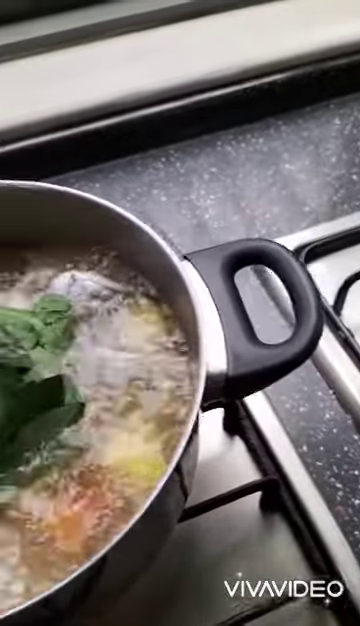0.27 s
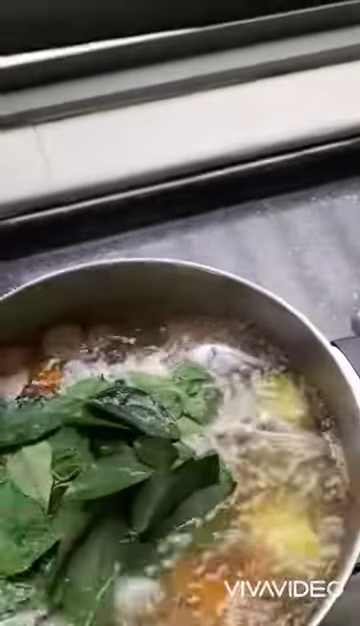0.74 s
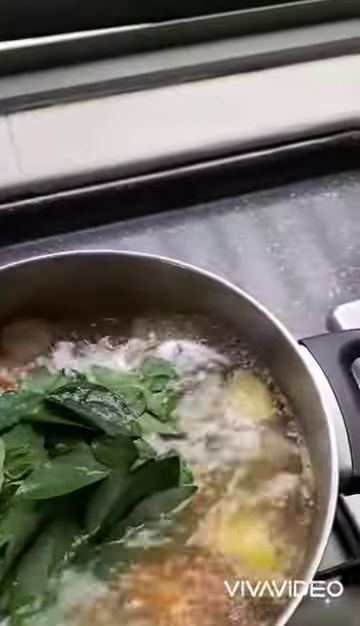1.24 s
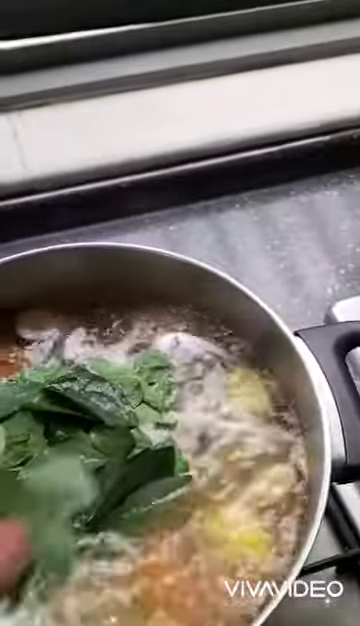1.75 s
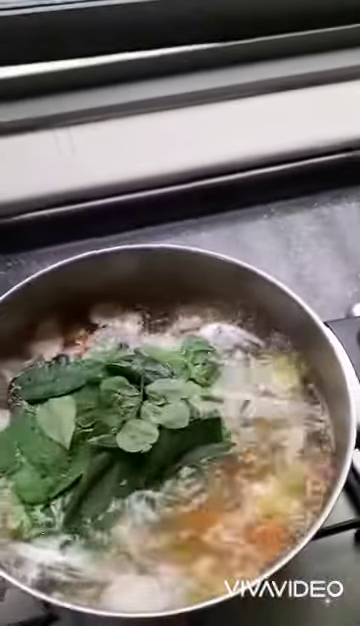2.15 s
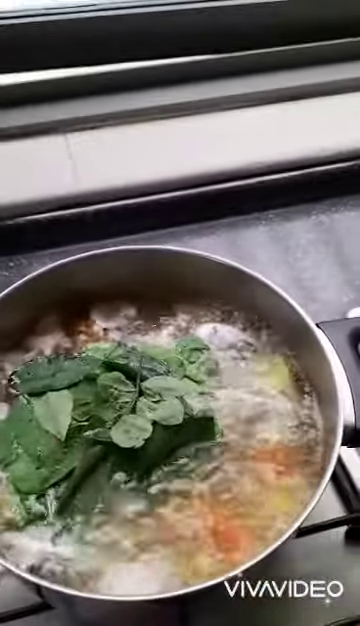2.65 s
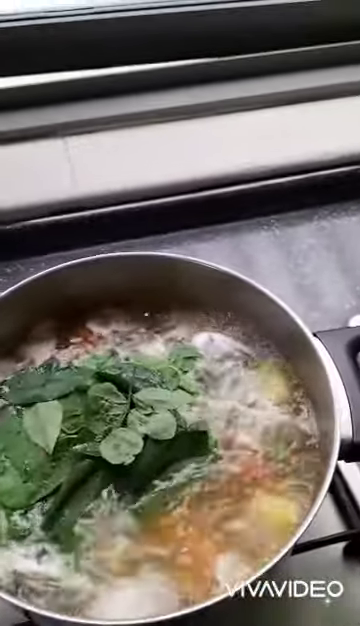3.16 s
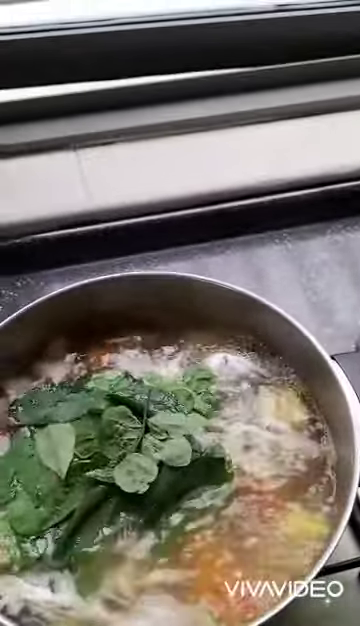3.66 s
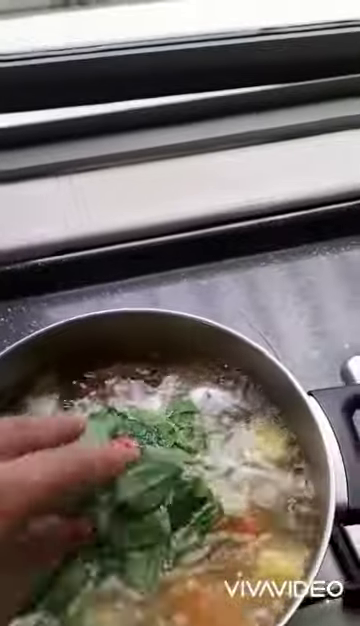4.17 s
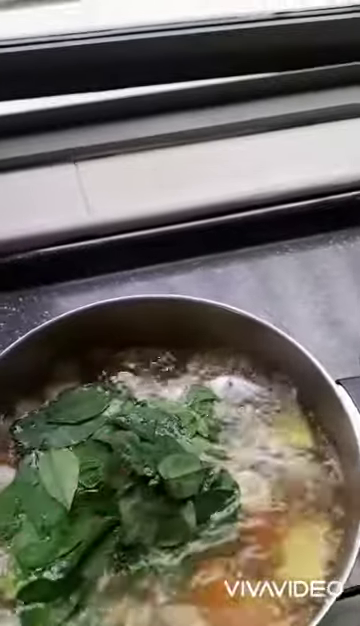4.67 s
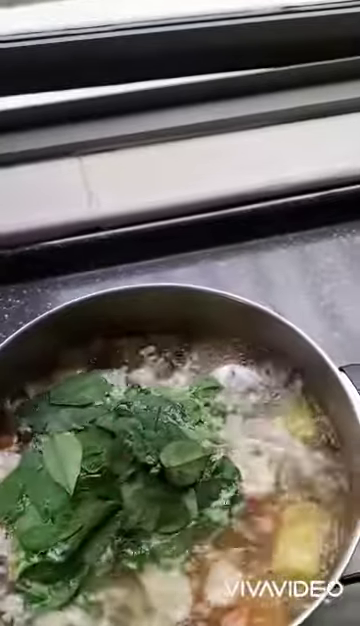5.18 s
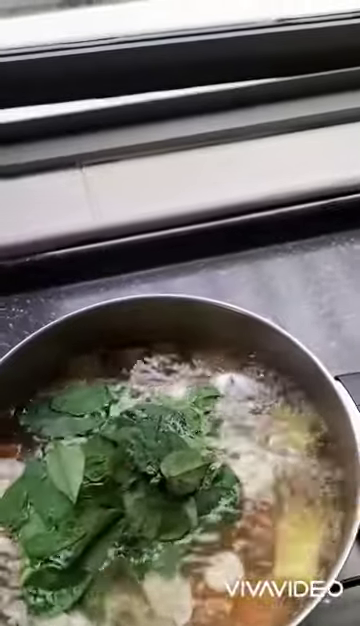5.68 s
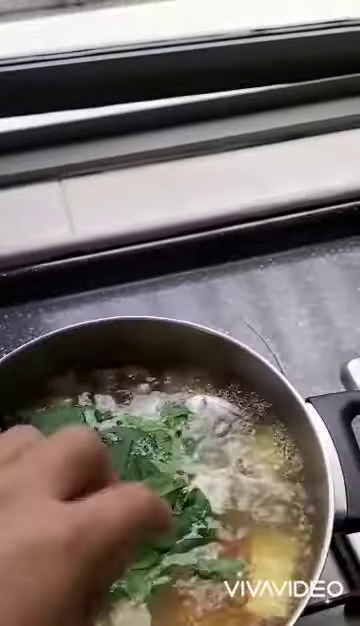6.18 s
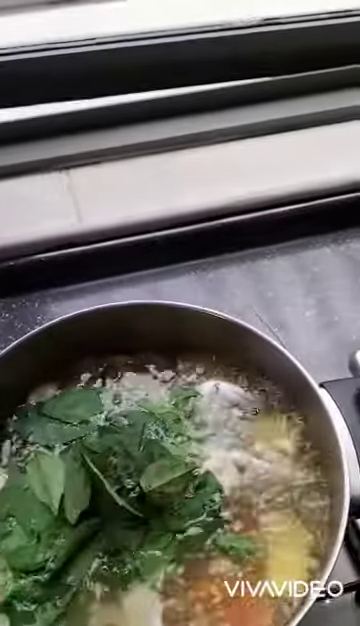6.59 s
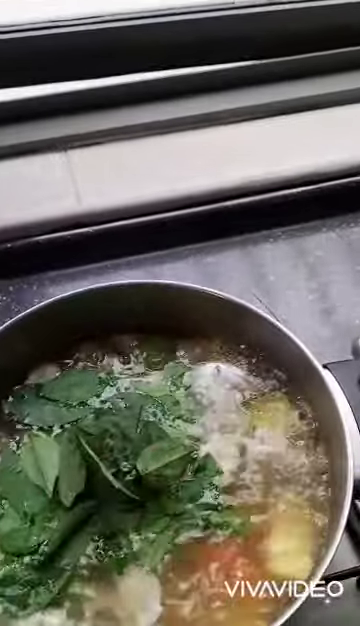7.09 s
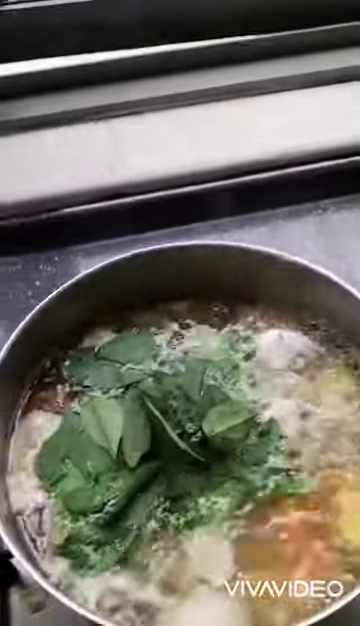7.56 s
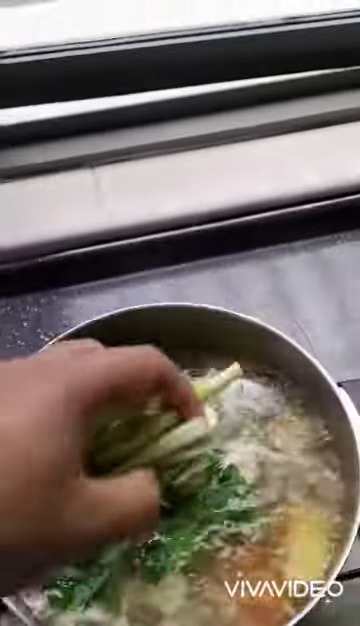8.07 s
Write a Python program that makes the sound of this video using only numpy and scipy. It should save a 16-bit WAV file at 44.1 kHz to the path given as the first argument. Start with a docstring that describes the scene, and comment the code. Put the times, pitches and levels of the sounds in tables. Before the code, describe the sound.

In a small hard-walled kitchen, close above a steel pot, a utensil bounces in a fast, loud, ringing clatter right at the start. A very quiet burner rush and simmer follow, with soft plops and spatter near three seconds, light hollow knocks, a faint wavering whistle, a sharper knock and droplets around seven, and a short sizzle near the end.

```python
"""Soup pot on a gas stove

Soup simmers in a steel pot in a small kitchen, heard from just above the rim. A utensil clatters against
the steel; later come light knocks, plops, spattering drops and a sizzle as greens are dropped in.
Struck things are sums of fading tones plus noise; bubbles are short tones that rise in pitch.
Spray, sizzle and the burner's rush are coloured noise; a faint whistle is one tone that rises and falls."""
import sys
import numpy as np
from scipy import signal
from scipy.fft import rfft, irfft, next_fast_len
from scipy.io import wavfile
from scipy.ndimage import uniform_filter1d

SR = 44100
rng = np.random.default_rng(int(sys.argv[2]) if len(sys.argv) > 2 else 0)


def transcribe(u):
    """Save the signal u as a 16-bit wav file named by the first command-line argument.

    u: samples, shape (n,) or (channels, n), limited to [-1, 1]; the rate is SR.
    q: integer samples, one column per channel.
    """
    v = np.clip(np.atleast_2d(u).T, -1, 1)
    q = np.round(v * 32767).astype(np.int16)
    wavfile.write(sys.argv[1], SR, q)


N = 367353
TAIL = 2 ** 15  # samples given to each short sound
TIME = np.arange(N) / SR  # s, since the start
AGE = np.arange(TAIL) / SR  # s, since a short sound began
BLOW_SAMPLES = SR * .02  # 20 ms

# blows of the clattering utensil: (t/s, level/dB, contact tone f/Hz, contact tone/dB, its t60/s, treble/dB)
CLATTER = [(.1602, -17, 920, 4.5, 0.024, 0), (.2271, -13, 900, 4.5, 0.02, -2.5),
           (.2358, -11, 1000, 9, .06, 5.5), (.2385, -19, 4060, -2, .04, -2),
           (.2465, -16.5, 997, 7, .05, -2.5), (.2657, -10.5, 820, 6.5, .03, 4.5),
           (.2748, -12.5, 786, 2, .025, 3), (.2822, -13.5, 760, 5.5, .012, 0.5),
           (.2936, -11.5, 3340, 1, .04, 4.5), (.2972, -15.5, 1700, 0.5, 0.017, 3.5),
           (.3074, -18.5, 950, 1, .025, 0), (.3100, -18.5, 1610, -0.5, 0.027, 0.5),
           (.3176, -20, 760, 3, .03, -1.5), (.3225, -21, 480, 2.5, .04, 0), (.3285, -21, 560, 4, .025, -12)]
FIRST_TOUCH, LATER_BLOWS = CLATTER[:1], CLATTER[1:]
# colour of the noisy crack of a hard blow: (f/Hz, level per Hz/dB)
CRACK = [(100, -26), (420, 2), (560, -3), (950, 0.5), (1420, -13.5), (1650, -9), (1950, -19.5),
         (2500, -10.5), (3050, -19), (3400, -10.5), (4800, -16.5), (6200, -27.5), (8500, -39), (11500, -51)]
# colour of water boiling off hot metal: (f/Hz, level per Hz/dB)
SIZZLE_COLOUR = [(1500, -8), (2700, 7.5), (4000, 6.5), (6500, -0.5), (7800, -20), (10500, -27),
                 (12500, -34)]


def undb(db):
    """Decibels to gain."""
    return 10 ** (np.asarray(db) / 20)


def unit(x):
    """Scale to an rms of one."""
    return x / np.sqrt(np.mean(x ** 2))


def burst(x):
    """Scale a short sound to the energy of 20 ms at an rms of one."""
    return x / np.sqrt(np.sum(x ** 2) / BLOW_SAMPLES)


def fade(t60):
    """Exponential decay that drops 60 dB in t60 seconds."""
    return np.exp(-np.log(1000) * AGE / max(t60, 1 / SR))


def swell(attack_s, length_s):
    """A straight rise multiplied by a rounded fall."""
    return np.minimum(AGE / attack_s, 1) * np.exp(-(AGE / length_s) ** 2)


def walk(rate):
    """Slow random motion with an rms near one: random steps, rate per second, smoothed into slopes."""
    step = int(SR / rate)
    stairs = np.repeat(rng.standard_normal(N // step + 1), step)
    return unit(uniform_filter1d(stairs, step)[:N])


def add(track, s, sound):
    """Mix a sound in at time s."""
    start = int(np.clip(s * SR, 0, N - 1))
    track[start:start + len(sound)] += sound[:N - start]


def freqs(x):
    """Frequencies of the spectrum of x, kept at 1 Hz or more so that their logarithm exists."""
    return np.maximum(np.fft.rfftfreq(len(x), 1 / SR), 1)


def on_log_axis(hz, points):
    """Read (Hz, value) points on a log-frequency axis."""
    at, value = np.transpose(points)
    return np.interp(np.log(hz), np.log(at), value)


def noise(points, size):
    """Noise with a given colour."""
    white = rng.standard_normal(next_fast_len(size))
    gain = undb(on_log_axis(freqs(white), points))
    return unit(irfft(rfft(white) * gain, len(white)))[:size]


def octaves(x):
    """Split into overlapping octave bands that sum to x: (centre Hz, band)."""
    centres = 2. ** np.arange(6, 15)
    padded = np.pad(x, (0, next_fast_len(len(x)) - len(x)))
    spectrum, axis = rfft(padded), np.log(freqs(padded))
    bands = []
    for hz in centres:
        share = np.interp(axis, np.log(centres), centres == hz)
        bands.append((hz, irfft(spectrum * share, len(padded))[:len(x)]))
    return bands


def lowpass(x, hz, order):
    """Butterworth low-pass."""
    return signal.sosfilt(signal.butter(order, min(hz, SR / 3), fs=SR, output="sos"), x)


def ring(hz, t60):
    """One mode: a tone that dies away."""
    return np.sin(2 * np.pi * hz * AGE) * fade(t60)


def split_ring(hz, t60):
    """A mode of a not quite round object: a close pair of tones, shifted a little by each contact."""
    stray = 0.0035 * np.clip(rng.standard_normal(2), -2, 2)  # share of the mode's frequency
    one, other = hz * (1 + stray)
    return ring(one, t60) + rng.uniform(-1.1, 1) * ring(other, t60)


def crack(colour, t60):
    """A burst of fading noise through a filter of the given colour, which never sounds ahead of the blow."""
    # folding the cepstrum onto positive times makes the filter causal
    cepstrum = irfft(np.log(undb(on_log_axis(freqs(AGE), colour))))
    cepstrum[1:] *= 2 * (np.arange(1, TAIL) < TAIL / 2)
    burst_of_noise = rng.standard_normal(TAIL) * fade(t60)
    return burst(irfft(np.exp(rfft(cepstrum)) * rfft(burst_of_noise)))


def blows(rows, modes, colour, ring_share, crack_db, crack_t60, swell_s, treble_hz, soft_hz):
    """Each blow rings the modes, cracks, and briefly sounds the resonance of the contact."""
    out = np.zeros(N)
    middling_db = np.mean([row[1] for row in rows])
    for s, db, contact_hz, contact_db, contact_t60, treble_db in rows:
        # blows louder than the average ring and crack for longer
        stretch = np.exp(0.0576 * (db - middling_db))
        # the place that is struck decides the sign and strength of each mode
        weights = rng.choice([-1, 1], len(modes)) * undb(rng.standard_normal(len(modes)))
        body = np.zeros(TAIL)
        for weight, (hz, mode_db, t60) in zip(weights, modes):
            body += weight * undb(mode_db) * split_ring(hz, t60 * ring_share * stretch)
        contact = ring(contact_hz, contact_t60) * (1 - fade(swell_s))
        # the contact force builds over about a millisecond
        hit = burst(body) + undb(crack_db) * crack(colour, crack_t60 * stretch)
        hit *= 1 - fade(0.0018)
        # each blow has its own amount of treble
        dull = lowpass(hit, treble_hz, order=1)
        hit = dull + undb(treble_db) * (hit - dull) + undb(contact_db) * burst(contact)
        # the push is not instant, and thin steel radiates little bass
        hit = lowpass(hit, soft_hz, order=3)
        hit = signal.sosfilt(signal.butter(2, 130, "high", fs=SR, output="sos"), hit)
        add(out, s, undb(db) * burst(hit))
    return out


def first_touch():
    """The utensil's first touch sounds its own short-lived modes."""
    # modes of the utensil: (f/Hz, level/dB, t60/s)
    utensil = [(409, -8, 0.05), (960, 0, .035), (1170, -7, .04), (1712, -1, .04), (2150, -2.5, .035),
               (2616, -8.5, 0.039), (3340, -1.5, .026), (4160, -7.5, .045), (4605, -13.5, .045),
               (6600, -25, .05)]
    return blows(FIRST_TOUCH, utensil, CRACK, ring_share=1.0, crack_db=-3, crack_t60=0.03,
                 swell_s=0.03, treble_hz=1800, soft_hz=5300)


def clatter():
    """The utensil bounces freely and rings the steel."""
    # modes of the steel: (f/Hz, level/dB, free t60/s)
    steel = [(256, -16, .4), (370, -7.5, 0.31), (413, -3, .24), (465, -2, .3), (556, -4, .22),
             (648, -8.5, .36), (710, -6.5, 0.25), (754.7, -1, 0.27), (838, -1, .28), (879.5, -3, 0.19),
             (946, -8, .26), (1000, 1, .24), (1543, -8, 0.38), (1660, -11.5, 0.4), (2072, -19.5, .45),
             (2377, -13, .38), (2584, -12, 0.5), (2960, -16.5, 0.23), (3187, -15.5, .28), (3400, -15.5, .3),
             (3652, -10, 0.22), (4135, -11, .3), (4250, -18, .56), (4765, -18.5, .38), (4910, -18, 0.43),
             (5720, -22.5, .27), (6500, -31, .3)]
    return blows(LATER_BLOWS, steel, CRACK, ring_share=.68, crack_db=-0.5, crack_t60=0.032,
                 swell_s=0.0048, treble_hz=1790, soft_hz=5800)


def shimmer():
    """Each free bounce leaves an even metallic wash, the many weak modes of the steel."""
    # colour of the wash: (f/Hz, level per Hz/dB)
    wash = [(30, -30), (70, -10), (270, -1), (900, -1), (1300, -9.5), (2600, -9.5), (4500, -13),
            (7000, -36), (11000, -61)]
    out = np.zeros(N)
    for s, db, *_ in LATER_BLOWS:
        add(out, s, undb(db - 14.5) * crack(wash, t60=0.42))
    return out


def knocks():
    """Light knocks make the full pot clack and ring; the soup damps its modes."""
    # knocks: (t/s, level/dB, contact tone f/Hz, contact tone/dB, its t60/s, treble/dB)
    rows = [(3.3338, -37, 1000, 4, 0.023, 4), (3.356, -46.5, 1000, -1, 0.032, -13),
            (3.446, -52.5, 990, 4, .025, 2), (3.469, -45, 1017, 5, 0.039, -9),
            (3.7725, -45.5, 530, -8, 0.037, 3), (3.781, -47, 423, 8.5, 0.048, -11),
            (5.0818, -40.5, 1066, 8.5, 0.11, 11), (5.1155, -39.5, 555, 4.5, 0.11, -7),
            (5.118, -44, 960, 11, 0.086, -7), (5.203, -52.5, 1050, 10, 0.044, -6),
            (5.6035, -37.5, 561, 4, 0.068, -1), (6.8735, -31.5, 1000, -2.5, 0.016, -2),
            (6.882, -40, 506, 4, 0.021, -15), (6.950, -51, 920, -3, .05, -11),
            (6.993, -54, 1760, 0, 0.072, -8), (7.033, -53, 1760, -2, 0.07, -5),
            (7.075, -51.5, 550, 8, 0.11, -6), (7.220, -47.5, 909, 0, 0.097, 2)]
    # modes of the pot: (f/Hz, level/dB, free t60/s)
    pot = [(248, -8.5, 0.11), (405.7, -7.5, 0.27), (560, -3.5, 0.2), (582, -11, 0.2), (901, -6.5, 0.19),
           (1100, -2.5, .06), (1380, -6, 0.045), (1760, -25, 0.2), (2525, -12, .07), (2890, -22, .13),
           (3280, -16.5, 0.14), (3725, -9.5, 0.069), (4470, -19.5, 0.048), (5650, -28, .13),
           (7030, -34, 0.12), (10200, -42, .15)]
    # colour of the hollow clack: (f/Hz, level per Hz/dB)
    clack = [(100, -16), (400, 0), (560, 1.5), (750, -11.5), (1000, -5.5), (1400, -23), (2150, -24),
             (2600, -14), (3050, -9), (3400, -10.5), (4700, -12.5), (5200, -25.5), (6700, -32),
             (11000, -40)]
    return blows(rows, pot, clack, ring_share=0.65, crack_db=-4.0, crack_t60=0.074,
                 swell_s=0.0049, treble_hz=1857, soft_hz=7400)


def slides(rows, modes, t60):
    """Fine stick-slip contacts keep the steel's modes ringing."""
    out = np.zeros(N)
    for s, db, length in rows:
        stroke = np.sin(np.pi * np.minimum(AGE / length, 1))
        slips = rng.standard_normal(TAIL) * stroke * undb(4 * walk(120)[:TAIL])
        body = np.zeros(TAIL)
        for hz, mode_db in modes:
            body += undb(mode_db) * unit(signal.fftconvolve(slips, ring(hz, t60))[:TAIL])
        add(out, s, undb(db) * burst(body))
    return out


def rim_slides():
    """Light slides make the rim sing."""
    # slides: (t/s, level/dB, length/s)
    rows = [(2.97, -59, .15), (3.34, -64, 0.036), (3.445, -58.5, 0.052), (5.085, -52, .17)]
    # modes of the rim: (f/Hz, level/dB)
    rim = [(1075, 5.5), (3285, 5), (3720, -2), (4550, -4), (5600, -1.5), (6560, -15), (7880, -29)]
    return slides(rows, rim, t60=0.044)


def wall_scrapes():
    """Scrapes excite the pot's wall."""
    # scrapes: (t/s, level/dB, length/s)
    rows = [(6.885, -46.5, .1), (6.97, -48, .15)]
    # modes of the wall: (f/Hz, level/dB)
    wall = [(400, -10), (556, -2), (588, 4), (915, -1.5), (1745, -9), (2480, -10), (3700, -13)]
    return slides(rows, wall, t60=.09)


def bumps():
    """Low thuds with a tick: handling, the pot on its grate, and low modes of the pot rung by the clatter."""
    # thuds: (t/s, level/dB, f/Hz, t60/s, tick relative to the thud/dB)
    rows = [(.087, -45, 254, 0.012, -5), (.172, -34, 149, 0.28, -21), (.27, -29.5, 146, 0.39, -30),
            (0.283, -23, 256, 0.27, -33), (0.6847, -47.5, 306, 0.01, 1.5), (2.902, -65, 418, 0.013, 4),
            (3.775, -51.5, 70.4, 0.47, -23), (6.874, -51, 165, 0.099, -17), (7.687, -52.5, 261, 0.025, -10),
            (7.83, -53.5, 250, 0.026, -17), (7.942, -53, 258, 0.07, 2)]
    out = np.zeros(N)
    for s, db, hz, t60, tick_db in rows:
        thud = ring(hz, t60) * (1 - fade(2 / hz))
        tick = lowpass(crack(CRACK, 0.008), 3200, order=3)
        add(out, s, undb(db) * (burst(thud) + undb(tick_db) * tick))
    return out


def bubble(hz, cycles, glide):
    """A trapped air pocket rings and rises in pitch as it nears the surface."""
    life = np.linspace(0, 1, max(int(SR * cycles / hz), 8))
    tone = np.sin(2 * np.pi * cycles * (life + glide * life ** 2 / 2))
    return tone * np.exp(-5 * life) * (1 - np.exp(-life / 0.16))


def plops():
    """Single bubbles ring where pieces and drops fall into the soup."""
    # bubbles: (t/s, level/dB, starting f/Hz)
    rows = [(1.389, -58, 414), (1.498, -56, 450), (2.901, -56.5, 625), (2.909, -46, 452), (2.97, -63, 4000),
            (2.994, -39, 436), (2.995, -53, 880), (3.012, -47.5, 397), (6.948, -50.5, 3230),
            (6.968, -61, 5080), (6.973, -58, 2380), (6.976, -55.5, 4300), (6.994, -61, 5070),
            (7.096, -59, 3720), (7.566, -63, 5390)]
    out = np.zeros(N)
    for s, db, hz in rows:
        cycles = 13.5 * (hz / 450) ** 0.6  # smaller, higher bubbles ring for more cycles
        add(out, s, undb(db) * burst(bubble(hz, cycles, glide=0.069)))
    return out


def fizz(hz, spread, scatter_db, cycles, count, size):
    """A cloud of tiny bubbles, a few much louder than the rest; spread is in octaves either way."""
    out = np.zeros(size)
    for when, pitch, strength in rng.random((count, 3)):
        grain_hz = min(hz * 2 ** (spread * (2 * pitch - 1)), SR / 3)
        grain = bubble(grain_hz, cycles, glide=0.068)
        start = int(when * size)
        gain = undb(-scatter_db * np.log(max(strength, .01)))
        out[start:start + len(grain)] += grain[:size - start] * gain
    return unit(out)


def spits():
    """Lone drops flash to steam on the hot wall with a bright tick and a tiny ping."""
    # drops: (t/s, level/dB, ping f/Hz, ping relative to the tick/dB)
    rows = [(2.995, -61.5, 5400, 2), (3.8438, -53.5, 4300, -11), (4.3515, -59, 4100, 13),
            (6.175, -67.5, 4100, -4), (6.9345, -69, 3800, -1), (7.5, -67, 4100, 5), (7.884, -64, 4490, 11)]
    out = np.zeros(N)
    for s, db, hz, ping_db in rows:
        tick = crack(SIZZLE_COLOUR, t60=0.014)
        ping = burst(ring(hz, 0.019))
        add(out, s, undb(db) * burst(tick + undb(ping_db) * ping))
    return out


def spray():
    """Showers of droplets on the soup and the hot wall swell quickly and die away, over a fine hiss."""
    # showers: (t/s, level/dB, length of the fall/s)
    rows = [(2.952, -60.5, 0.078), (2.986, -62, 0.063), (3.09, -64, 0.056), (3.796, -60.5, 0.046),
            (4.332, -66, 0.052), (6.919, -63, 0.16), (7.081, -53.5, .045), (7.165, -59.5, 0.08),
            (7.273, -58, 0.035)]
    hiss_colour = [(1200, 2), (3800, 11.0), (7000, 1), (8500, -16.5), (10300, -9), (12000, -25)]
    out = np.zeros(N)
    for s, db, length in rows:
        drops = fizz(4300, spread=.5, scatter_db=5, cycles=30, count=350, size=TAIL)
        hiss = noise(hiss_colour, TAIL)
        # the droplets land in clumps
        clumps = unit(undb(3 * walk(160)[:TAIL]))
        add(out, s, undb(db) * swell(0.019, length) * clumps * (drops + undb(1) * hiss))
    return out


def sizzle():
    """Water boils off the wet greens: a sputtering hiss and short, gliding squeals of steam."""
    # squeals: (t/s, level/dB, length of the fall/s, starting f/Hz, glide/Hz per s)
    squeals = [(7.647, -64, 0.14, 3160, -600), (7.902, -55.5, .17, 3280, -400),
               (8.157, -60.5, 0.13, 3650, 400)]
    landing_s, attack_s, settle_s = 7.938, 0.0058, 0.048
    # the hiss leaps as the greens land, then settles
    age = np.maximum(TIME - landing_s, 0)
    hiss_db = -67 + 12.5 * np.exp(-age / settle_s)
    steam = np.minimum(age / attack_s, 1) * undb(hiss_db) * noise(SIZZLE_COLOUR, N)
    for s, db, length, hz, glide in squeals:
        pitch = hz + glide * AGE + 110 * walk(220)[:TAIL]
        flutter = undb(3.5 * walk(110)[:TAIL])
        squeal = unit(np.sin(2 * np.pi * np.cumsum(pitch) / SR) * flutter)
        add(steam, s, undb(db) * swell(0.049, length) * squeal)
    return steam * undb(2 * walk(90))


def whistle():
    """A thin unsteady tone rises slowly, then sinks faster; apart from its swells, lower is fainter."""
    # swells of the faint tone; the last, near 1.1 kHz, is the pot rim ringing after a knock:
    # (t/s, boost/dB, half length/s)
    swells = [(3.05, 7.5, 0.22), (4.092, 5.46, 0.23), (5.28, 8.5, 0.11)]
    peak_s, peak_hz = 4.05, 1162
    since = TIME - peak_s
    curve = np.where(since < 0, 24, 62)  # Hz per s squared
    sag_hz = curve * since ** 2
    boost_db = sum(db * np.exp(-((TIME - s) / length) ** 2) for s, db, length in swells)
    level_db = -67.5 + boost_db - 0.1 * sag_hz + 3.2 * walk(14)
    pitch = peak_hz - sag_hz + 7 * walk(60)
    return undb(level_db) * np.sin(2 * np.pi * np.cumsum(pitch) / SR)


def stove():
    """The burner's flickering rush of noise, wavering hum tones and the simmer's fine popping bubbles."""
    # colour of the rush: (f/Hz, level per Hz/dB)
    burner = [(15, -60.5), (25, -33.5), (53, -11), (148, -2.5), (254, -1.5), (484, -8.5), (523, -16.5),
              (565, -10), (700, -11), (1040, -5.5), (1220, -11.5), (1620, -12), (1950, -23.5), (2720, -19),
              (4110, -23.5), (5890, -36.5), (7430, -53), (11400, -57), (16000, -92.5)]
    # hum tones: (f/Hz, level/dB)
    hum_lines = [(145.3, -71.5), (262, -78), (532.9, -72), (678.3, -77.5)]
    # each octave flickers on its own
    rush = unit(sum(band * undb(1.0 * walk(15)) for _, band in octaves(noise(burner, N))))
    hum = np.zeros(N)
    for hz, line_db in hum_lines:
        pitch = hz + 2.8 * walk(13)
        tone = np.sqrt(2) * np.sin(2 * np.pi * np.cumsum(pitch) / SR)
        hum += undb(line_db + 2 * walk(9.5)) * tone
    simmer = fizz(3000, spread=.7, scatter_db=3, cycles=12, count=2500, size=N)
    return undb(-57.5) * rush + hum + undb(-78) * simmer


def kitchen(x, wet_db):
    """Add diffuse echoes from hard walls a metre or two away: noise that fades at its own rate per octave."""
    # how long the room rings: (f/Hz, t60/s)
    room = [(150, 0.7), (500, 0.32), (1000, 0.52), (3000, 0.56), (6000, 0.25), (11000, 0.55)]
    tail = sum(band * fade(on_log_axis(hz, room)) for hz, band in octaves(rng.standard_normal(TAIL)))
    tail *= np.clip(AGE / 0.006, 0, 1) ** 2  # the echoes build up over 6 ms
    echoes = signal.fftconvolve(x, tail / np.sqrt(np.sum(tail ** 2)))[:N]
    return x + undb(wet_db) * echoes


def scene():
    """All sources in the kitchen, one channel."""
    steel = kitchen(first_touch(), wet_db=-12.0) + kitchen(clatter(), wet_db=-13) + shimmer()
    pot = knocks() + rim_slides() + wall_scrapes()
    soup = plops() + spits() + spray() + sizzle()
    near = kitchen(pot + soup, wet_db=-11.0)
    return (steel + near + bumps() + whistle() + stove())[None]


def record(dry):
    """Gain drops at once on loud sounds and recovers slowly; peaks are rounded and the top is cut."""
    threshold_db, ratio, recovery_db_per_s = -16, 2, 7
    level_db = 10 * np.log10(np.abs(uniform_filter1d(dry ** 2, int(BLOW_SAMPLES))) + 1e-12)
    # hold each peak of the level and let it sink at the recovery rate
    recovery = recovery_db_per_s * TIME
    held_db = np.maximum.accumulate(level_db + recovery, axis=-1) - recovery
    excess_db = np.maximum(held_db - threshold_db, 0)
    ducked = dry * undb(-excess_db * (1 - 1 / ratio))
    rounded = ducked / (1 + (ducked / .85) ** 6) ** (1 / 6)
    return signal.sosfilt(signal.ellip(8, .2, 70, 11600, fs=SR, output="sos"), rounded)


dry = scene()
out = record(dry)
transcribe(out)
```